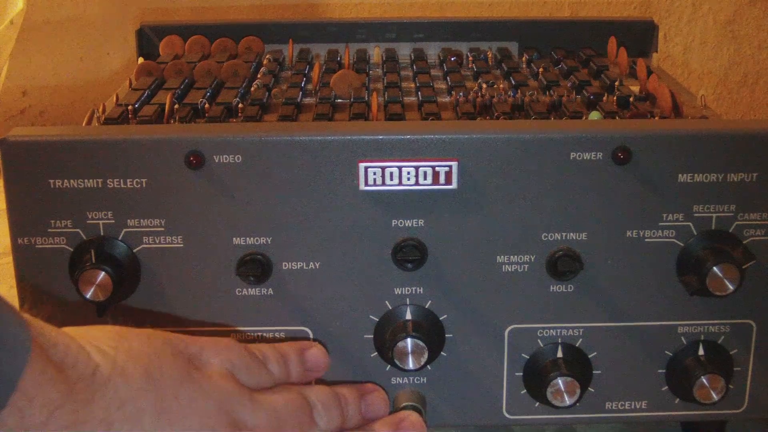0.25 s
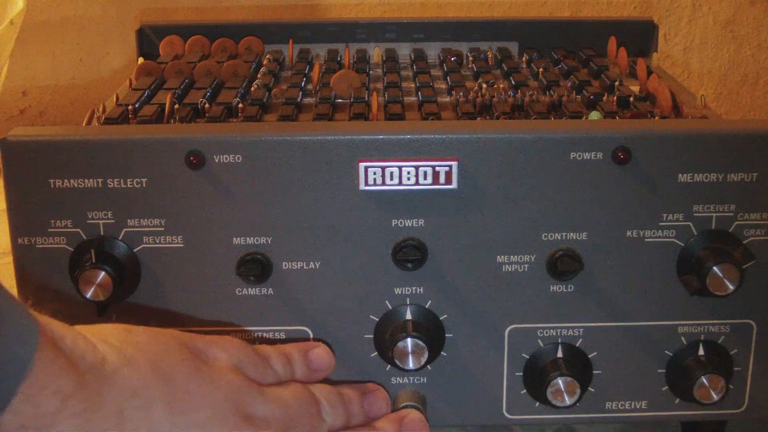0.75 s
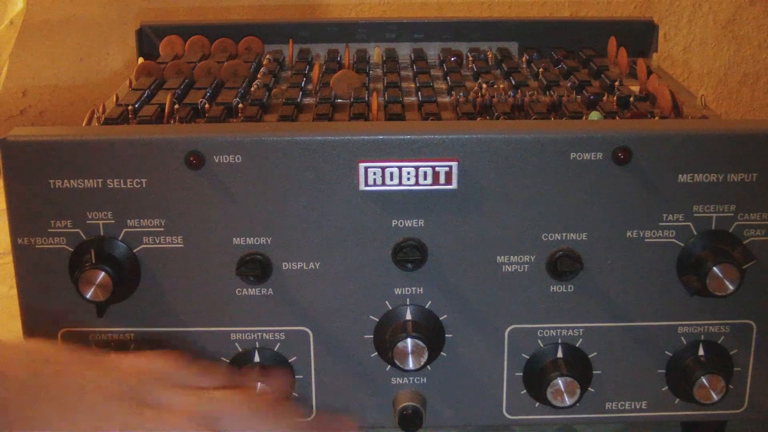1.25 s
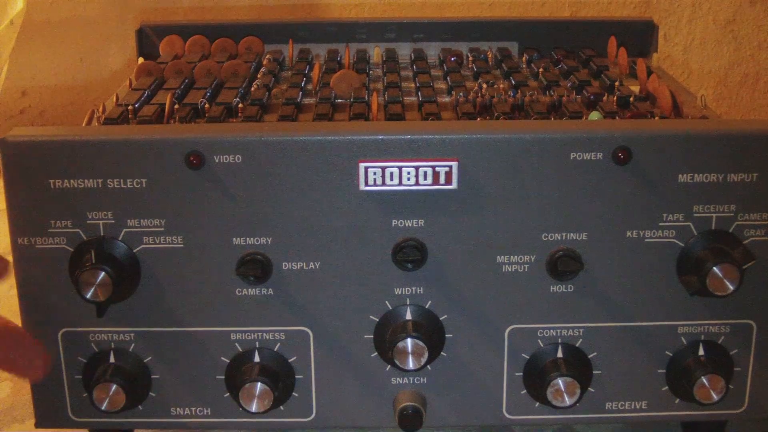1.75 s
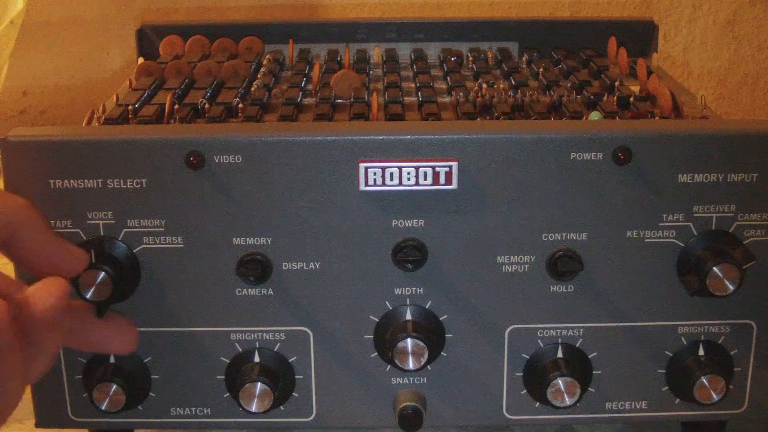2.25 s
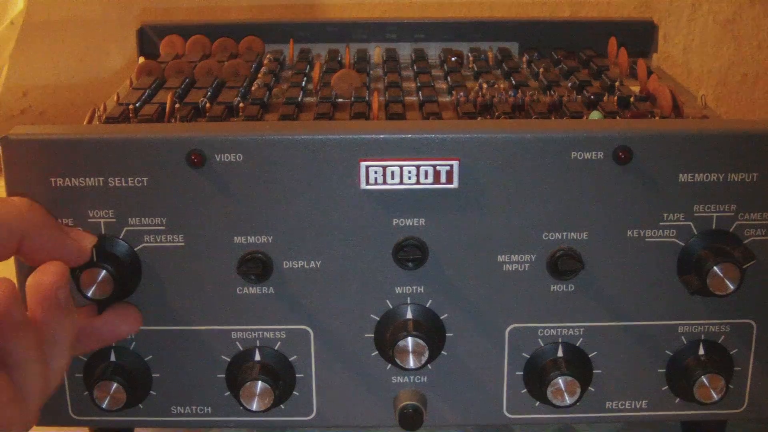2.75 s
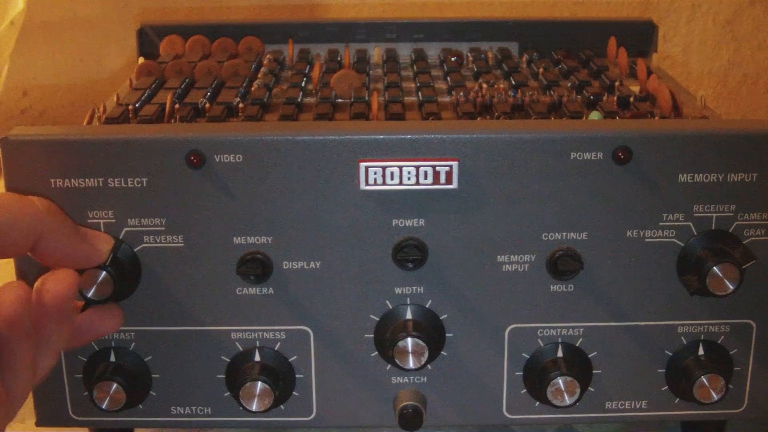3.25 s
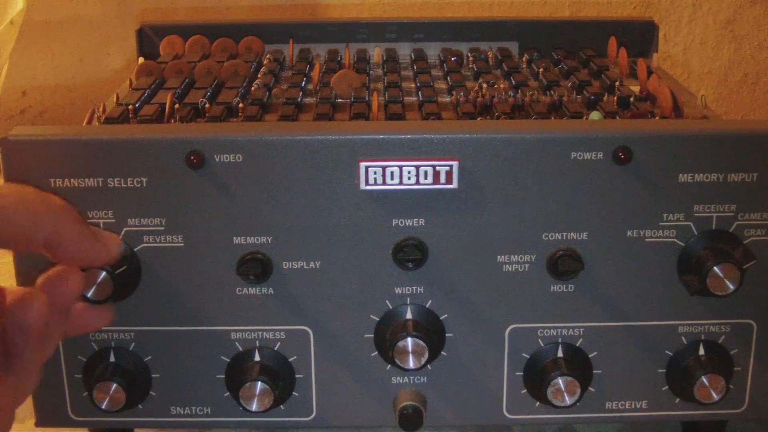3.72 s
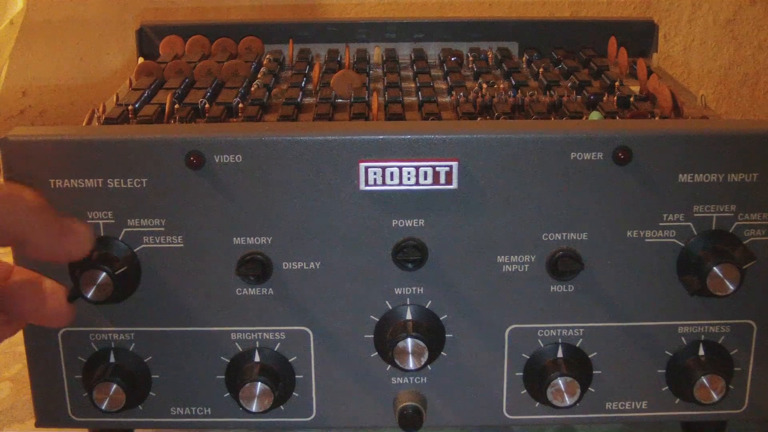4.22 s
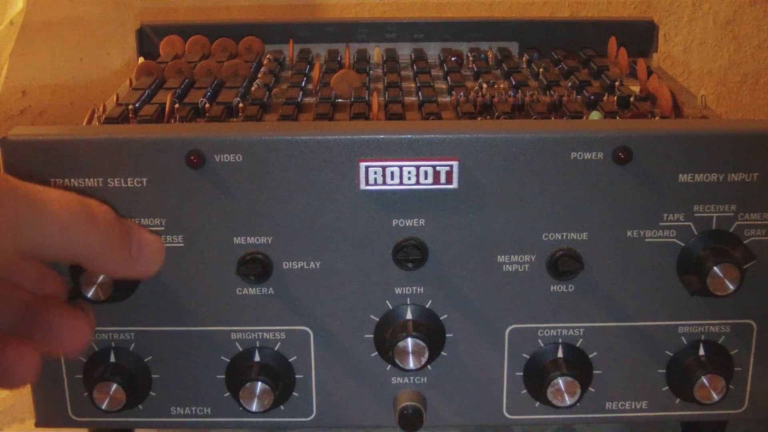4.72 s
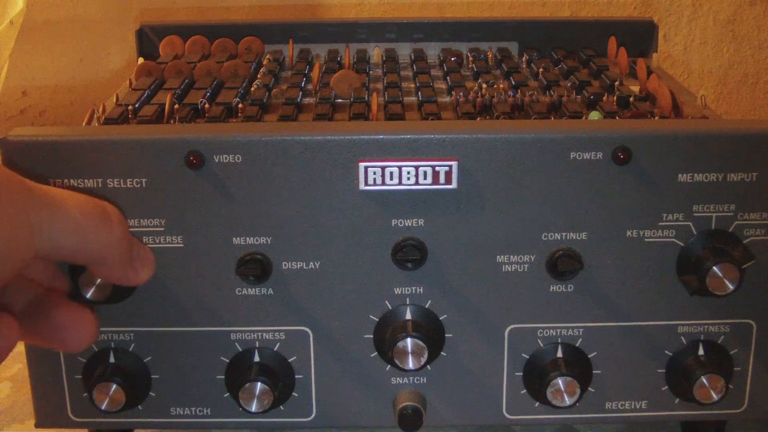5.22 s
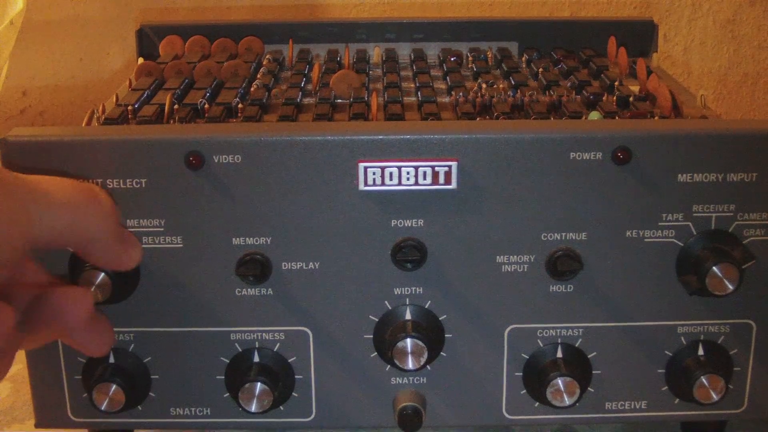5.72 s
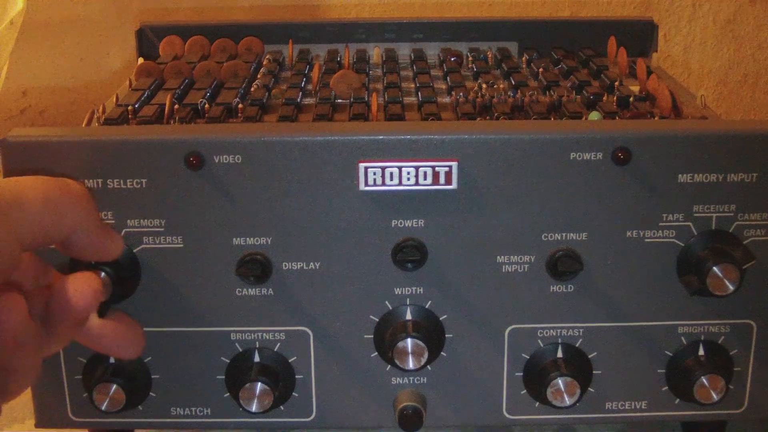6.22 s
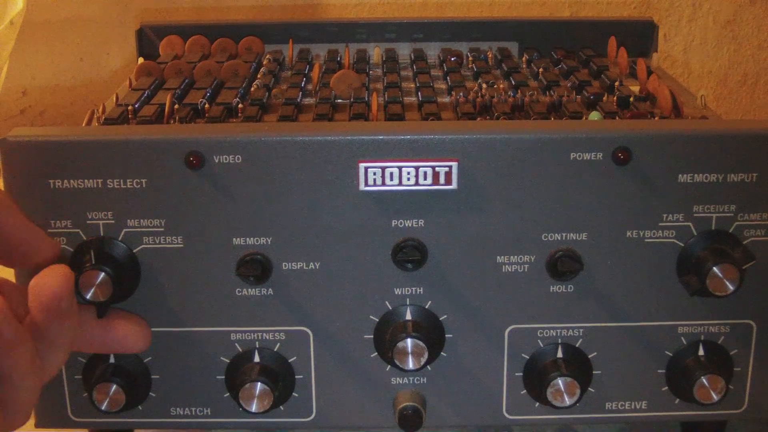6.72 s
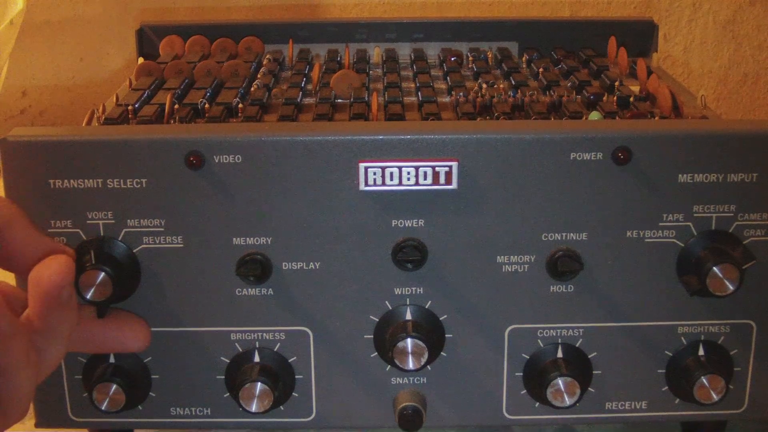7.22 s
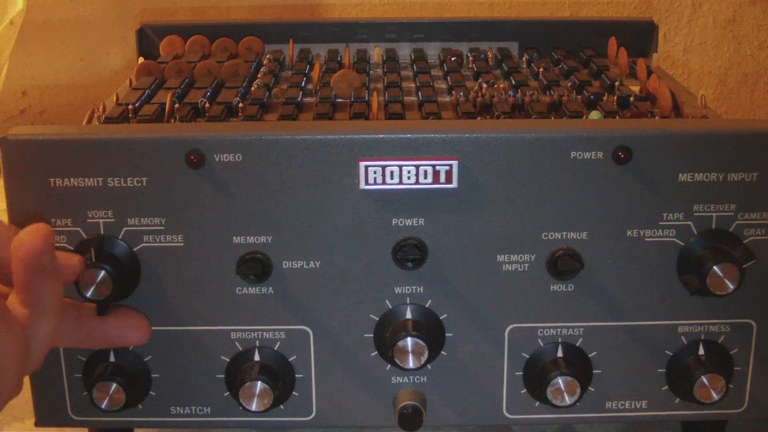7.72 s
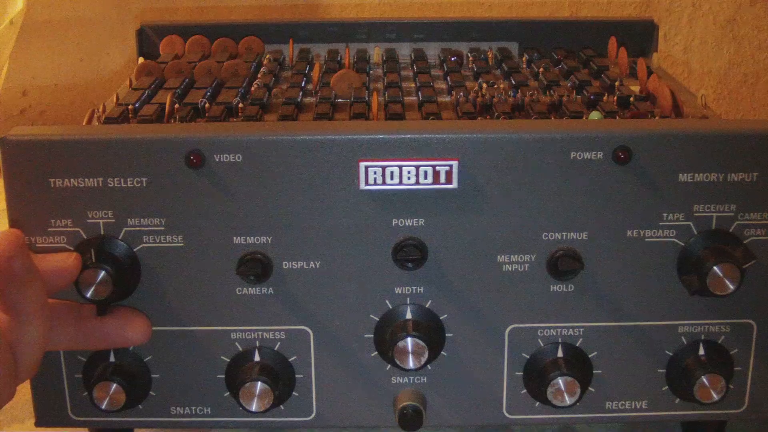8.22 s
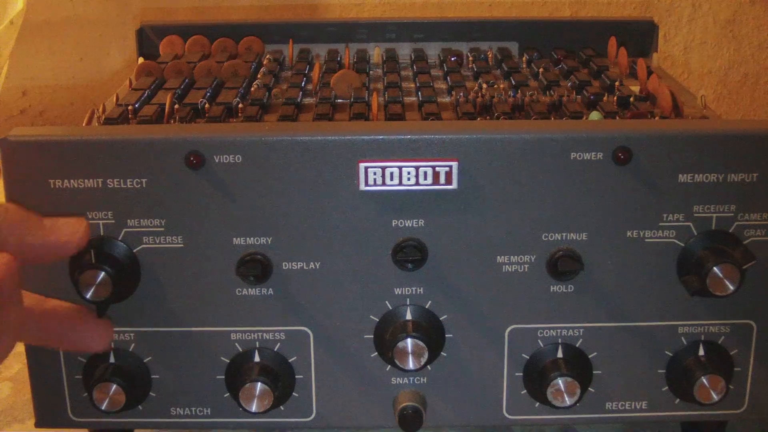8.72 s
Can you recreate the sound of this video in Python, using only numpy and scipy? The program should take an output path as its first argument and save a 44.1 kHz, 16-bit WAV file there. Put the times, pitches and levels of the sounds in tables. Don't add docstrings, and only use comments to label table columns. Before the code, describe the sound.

Faint ticks and a sharp button click, then four hard rotary switch snaps in two pairs on a metal panel in a quiet, hissy room.

```python
import sys
import numpy as np
from scipy import signal
from scipy.fft import rfft, irfft
from scipy.io import wavfile

SR = 44100
rng = np.random.default_rng(int(sys.argv[2]) if len(sys.argv) > 2 else 0)


def to_linear_factor(level_db):
    exponent = np.asarray(level_db, float) / 20
    return 10 ** exponent


def to_wav(sig):
    pcm = np.clip(np.atleast_2d(sig), -1, 1) * 32767
    pcm = np.round(pcm).astype(np.int16)
    wavfile.write(sys.argv[1], SR, pcm.T)


N = 395136
SPAN = 2 ** 13
OCTAVES_HZ = 12 * 2 ** np.arange(12.)


def at_hz(points, hz):
    points_hz, values = np.array(points).T
    return np.interp(np.log(hz), np.log(points_hz), values)


def rms_one(x):
    return x / np.sqrt(np.mean(x ** 2) + 1e-20)


def fade(t60_s):
    return np.exp(-np.log(1000) * np.arange(SPAN) / SR / max(t60_s, 1e-4))


def ring(hz, t60_s, rise_s, phase=0):
    tone = np.sin(2 * np.pi * hz * np.arange(SPAN) / SR + phase)
    return tone * fade(t60_s) * (1 - fade(rise_s))


def stereo_noise(size, colour, likeness):
    hz = np.maximum(np.arange(size // 2 + 1) * SR / size, 1)
    mid, side = rfft(rng.standard_normal((2, size))) * rms_one(to_linear_factor(at_hz(colour, hz)))
    alike = np.clip(at_hz(likeness, hz), -1, 1)
    mid, side = np.sqrt(1 + alike) * mid, np.sqrt(1 - alike) * side
    return hz, (mid + side * [[1], [-1]]) / np.sqrt(2)


def bands(hz, spectra, first):
    for centre_hz in OCTAVES_HZ[first:]:
        weight = np.clip(1 - np.abs(np.log2(hz / centre_hz)), 0, 1)
        yield centre_hz, irfft(spectra * weight)


def add(out, sound, start_s):
    at = round(start_s * SR)
    out[:, at:at + SPAN] += sound[..., :N - at]


def drift(rate_hz):
    return np.interp(np.arange(N) * rate_hz / SR, np.arange(400), rng.standard_normal(400))


# freq_hz, likeness [0-1]
NEAR_LIKENESS = [(300, 0.6), (1700, 0.9), (3100, 0.6), (6800, 0.1), (15000, 0)]
# freq_hz, likeness [0-1]
CRACK_LIKENESS = [(300, 0.8), (2000, .8), (3300, 0.98), (4700, .7), (6800, 0.15), (9000, 0.1), (13000, 0.3)]
# freq_hz, t60_s
TAIL_T60 = [(300, 0.076), (1000, 0.14), (2500, 0.17), (6000, 0.18), (12000, 0.14), (20000, .17)]


def strikes(contacts, crack_colour, tail_colour, modes, main_t60_s, crack_db, crack_t60_s,
            modes_db, tail_db, tail_stretch, settle_db):
    out = np.zeros((2, N))
    gather = 1 - fade(0.0048)
    for k, (start_s, peak_db, main_hz, treble_db, wet_db, pan_db) in enumerate(contacts):
        phase = rng.uniform(-0.6, 0.26, (2, 1)) + [[0.1 * pan_db], [0]]
        sound = ring(main_hz, main_t60_s, 0.0021, phase)

        for hz, db, t60_s in modes:
            gain = to_linear_factor(modes_db + db + rng.normal(0, 4.7, (2, 1)))
            sound += gain * ring(hz, min(t60_s, 0.09), 0.0018, rng.uniform(-1.3, 2.4, (2, 1)))

        hz, crack = stereo_noise(SPAN, crack_colour, CRACK_LIKENESS)
        tilt_db = treble_db * np.log2(np.maximum(hz, 2000) / 5000)
        crack_gain = to_linear_factor(crack_db - settle_db * (k > 0))
        sound += crack_gain * irfft(crack * to_linear_factor(tilt_db)) * fade(crack_t60_s) * (1 - fade(0.001))
        sound /= np.abs(sound).max()

        lumps_db = 1.5 * np.interp(np.arange(SPAN) / 90, np.arange(200), rng.standard_normal(200))
        tail_gain = to_linear_factor(tail_db + wet_db + lumps_db) * gather
        for centre_hz, pair in bands(*stereo_noise(SPAN, tail_colour, NEAR_LIKENESS), first=4):
            sound += tail_gain * pair * fade(tail_stretch * at_hz(TAIL_T60, centre_hz))
        add(out, to_linear_factor(peak_db) * sound * to_linear_factor([[pan_db / 2], [-pan_db / 2]]), start_s)
    return out


def skin(strokes, colour, grain_db):
    t = np.arange(N) / SR
    gain = 0
    for loudest_s, level_db, swell_s, fade_s in strokes:
        fall_db = 30 * np.maximum((loudest_s - t) / swell_s, (t - loudest_s) / fade_s)
        gain = gain + to_linear_factor(level_db - fall_db)
    grain = to_linear_factor(grain_db * np.repeat(rng.standard_normal(N // 64 + 1), 64)[:N])
    noise = irfft(stereo_noise(N, colour, NEAR_LIKENESS)[1])
    return gain * rms_one(grain * noise)


# freq_hz, density_db [dB per Hz]
HISS = [(8, -19), (14, -7), (54, -8.5), (200, -16), (420, -18), (620, -22), (1300, -27), (3500, -28),
        (6300, -26.5), (7700, -26.5), (8400, -33), (12000, -35), (15200, -33.5), (15500, -59)]
# freq_hz, likeness [0-1]
AIR_LIKENESS = [(60, 0.33), (180, 0.42), (550, 0.52), (1650, 0.48), (4970, 0.05), (15000, 0.11)]
# freq_hz, left_minus_right_db
AIR_LEAN = [(60, -0.5), (240, -0.5), (950, -0.5), (3770, 0.5), (15000, 1)]


def air():
    hiss, together = 0, drift(2)
    for hz, pair in bands(*stereo_noise(N, HISS, AIR_LIKENESS), first=0):
        lean_db = at_hz(AIR_LEAN, hz) * np.array([[0.5], [-0.5]])
        patch_db = 0.9 * (together + drift(9)) * np.clip(np.log2(3000 / hz) / 3, 0.25, 1)
        hiss = hiss + to_linear_factor(lean_db + patch_db) * pair
    return to_linear_factor(-61.5) * rms_one(hiss)


# start_s, peak_db, main_hz, treble_db [dB per octave], left_minus_right_db
TICKS = [(0.019, -42, 6750, 9, 4), (0.1084, -22, 4080, -7.5, -2), (0.4346, -38, 4150, -13, 1),
         (0.445, -35, 3960, -6, -2), (0.458, -44, 4460, -1, 0), (0.614, -31.5, 4130, -17, 2.5),
         (0.6476, -44, 3800, 15, 3), (0.802, -41, 4030, -30, -1), (1.0021, -47, 6030, 8, 2.5),
         (1.036, -41, 3700, -12, -4), (1.0433, -38, 4500, -5, 4), (1.205, -37.5, 4130, 14, 2),
         (1.2311, -10, 4150, 1, -0.5), (1.2346, -29, 4370, 11, 0.5), (1.426, -48, 6550, 4, 1.0)]
# freq_hz, density_db [dB per Hz]
TICK_CRACK = [(710, -87), (1200, -18), (2450, -40), (3590, -7), (4310, 5.5), (5650, -6), (9820, -15),
              (15000, -36), (16000, -38)]
# freq_hz, density_db [dB per Hz]
TICK_TAIL = [(590, -51.5), (1000, -15), (1630, -27), (1840, -15), (3120, -15.5), (4300, -1.5),
             (5180, -10.5), (8060, -8.5), (14000, -50)]


def button_ticks():
    contacts = [(s, db, hz, treble_db, -1.9, pan_db) for s, db, hz, treble_db, pan_db in TICKS]
    return strikes(contacts, TICK_CRACK, TICK_TAIL, [], main_t60_s=0.005, crack_db=-1.5,
                   crack_t60_s=0.0044, modes_db=0, tail_db=-24.5, tail_stretch=0.85, settle_db=2)


# loudest_s, level_db, swell_s, fade_s
SCUFFS = [
    (0.448, -52.5, .025, 0.033),
    (1.046, -48, 0.049, 0.055),
    (1.222, -51, 0.095, 0.0061),
]
# freq_hz, density_db [dB per Hz]
SCUFF = [(710, -49.5), (1200, -11), (1480, -16), (3030, -12.5), (4390, -4.5), (7010, -12), (9830, -32),
         (13000, -39)]


def button_scuffs():
    return skin(SCUFFS, SCUFF, grain_db=2.5)


# start_s, drum_db, push_db, slip_db
THUDS = [
    (1.232, -60, -49, -42),
    (3.068, -38.5, -37, -36.5),
    (3.605, -43, -30.5, -32),
    (5.588, -48.5, -50, -37),
    (6.2, -49, -44, -31.5),
]
# freq_hz, level_db, t60_s
CHASSIS = [(190, -6, 0.13), (258.2, -3.5, 0.22), (284, -1, 0.22), (315, -2, .14), (352.2, 1, 0.029),
           (409.4, -6.5, 0.067), (490, -1.5, 0.1), (620, -8.5, 0.087), (934, -7.5, .1)]
# freq_hz, density_db [dB per Hz]
KNOB_CRACK = [(1200, -29), (2500, -3.5), (4500, 0), (7000, -3.5), (10000, -8.5), (13000, -15), (16000, -31)]


def thuds():
    out = np.zeros((2, N))
    for start_s, drum_db, push_db, slip_db in THUDS:
        drum = 0
        for hz, db, t60_s in CHASSIS:
            gain = to_linear_factor(db + rng.normal(0, 2, (2, 1)))
            drum = drum + gain * ring(hz, 1.1 * t60_s, 0.029, rng.uniform(0, 0.9, (2, 1)))
        push = ring(45, 0.093, 0.0047) + 0.4 * ring(110, 0.047, 0.003)
        jolt = to_linear_factor(drum_db) * drum + to_linear_factor(push_db) * push
        add(out, jolt * to_linear_factor([[2.2], [-2.2]]), start_s)

        climb = (fade(0.009) + 0.1 * fade(0.067))[::-1]
        slip = irfft(stereo_noise(SPAN, KNOB_CRACK, NEAR_LIKENESS)[1]) * climb
        add(out, to_linear_factor(slip_db) * slip, start_s - SPAN / SR)
    return out


# first_s, last_s, first_db, last_db
STEPS = [
    (2.178, 2.179, -48, -51),
    (2.771, 2.906, -46.5, -40),
    (3.171, 3.338, -49.5, -49.5),
    (3.372, 3.439, -44, -42.5),
]


def motor_steps():
    rows = []
    for first_s, last_s, first_db, last_db in STEPS:
        count = round((last_s - first_s) * 30) + 1
        db = np.linspace(first_db, last_db, count) + 0.7 * rng.standard_normal(count)
        treble_db = -3.5 + 0.9 * (db + 44.5)
        rows += zip(np.linspace(first_s, last_s, count), db, treble_db)
    return rows


# freq_hz, level_db, t60_s
LENS = [(923, -8.5, 0.07), (1022, -3, 0.042), (1605, -9, .03), (2300, -17, 0.1), (2550, 4.5, 0.022),
        (2770, -5.5, 0.03), (3520, -1, 0.017), (5050, -3, 0.016)]
# freq_hz, density_db [dB per Hz]
LENS_TOP = [(1650, -11), (2800, -19), (3100, -3), (4580, -7), (5050, -5), (7330, -2.5), (11000, -27),
            (14300, -59), (22000, -120)]


def lens():
    out = np.zeros((2, N))
    for start_s, peak_db, treble_db in motor_steps():
        low = 0
        for hz, db, t60_s in LENS:
            gain = to_linear_factor(db + rng.normal(0, 1.4) + treble_db * (hz > 3000))
            low = low + gain * ring(hz, t60_s, 8.6 / hz)
        top = irfft(stereo_noise(SPAN, LENS_TOP, NEAR_LIKENESS)[1]) * fade(0.025) * (1 - fade(0.00079))
        step = to_linear_factor(peak_db - 4.5) * (low * to_linear_factor([[-6], [3]]) + to_linear_factor(treble_db) * top)
        add(out, step, start_s)
        add(out, 0.24 * step, start_s - rng.uniform(0.00185, 0.0026))
    return out


# start_s, peak_db, main_hz, treble_db [dB per octave]
PLAY = [
    (2.9542, -42, 4550, -6),
    (2.9796, -46, 4300, -5),
    (3.0307, -46, 4550, -2),
    (3.5698, -46, 4300, 6),
    (4.209, -53.5, 6540, 1),
    (6.4918, -37.5, 4640, 8.5),
    (6.6119, -42, 4630, 1),
    (8.632, -37.5, 6650, -1),
]
# freq_hz, level_db, t60_s
KNOB = [(2650, -4.5, 0.016), (4370, -2.5, 0.024)]


def knob_play():
    contacts = [(*row, 2.5, -0.4) for row in PLAY]
    return strikes(contacts, KNOB_CRACK, TAILS[3], KNOB, main_t60_s=0.0046, crack_db=-4.0,
                   crack_t60_s=0.0028, modes_db=-12, tail_db=-24.5, tail_stretch=0.4, settle_db=-1)


# start_s, peak_db, main_hz, treble_db [dB per octave], tail_db
SNAPS = [
    [(3.0691, -2.5, 6810, 1.5, 0.5), (3.0722, -4, 7000, 2, -3), (3.0748, -14.5, 6500, 0, 2.5)],
    [(3.6049, 0, 7360, 4, -0.5), (3.6060, -8, 4270, -3.5, -7), (3.6080, -4.5, 7100, 0, -10),
     (3.6114, -14, 6800, -5, 0)],
    [(5.5878, -13.5, 6670, 1, -3), (5.5887, -15, 4600, -2, -4.5), (5.5915, -22.5, 6440, -4.5, -4),
     (5.5945, -30, 6420, 7, 0)],
    [(6.1982, -22, 4700, 1, 3), (6.1997, -6.5, 6100, -2.5, -4.5), (6.2008, -8, 4600, 2, 5),
     (6.2030, -9.5, 6200, -2, -7.5), (6.2048, -16.5, 6600, -4, -1), (6.2075, -23.5, 7000, 7, -6.5)],
]
# freq_hz, density_db [dB per Hz]
CRACKS = [
    [(240, -47.5), (400, -11), (1600, -30.5), (3070, -15.5), (4400, -5), (7280, -4), (8630, -11),
     (14800, -19), (16000, -35)],
    [(240, -51.5), (800, -28), (2590, -18.5), (4240, -3.5), (5350, -4.5), (7170, -7.5), (8110, -8),
     (14800, -20), (16000, -33.5)],
    [(240, -51), (400, -25), (3500, -13), (4650, -6), (5430, -7), (6340, -1), (11800, -11), (15300, -28),
     (16000, -32)],
    [(240, -67.5), (400, -25.5), (1560, -37.5), (2590, -22), (3120, -19), (6240, -2), (8500, -14),
     (15300, -20.5), (16000, -37.5)],
]
# freq_hz, density_db [dB per Hz]
TAILS = [
    [(240, -48), (400, -12.5), (489, -24.5), (1840, -25), (2550, -12.5), (2800, -30), (3070, -19.5),
     (6640, -1.5), (14600, -23.5), (16000, -39)],
    [(240, -48), (400, -19), (496, -8), (760, -22.5), (1900, -14), (2250, -13), (5690, -5), (6850, -1.5),
     (14600, -17), (16000, -36)],
    [(240, -30), (400, 1), (504, -10), (1230, -16), (2630, -12), (3750, -13), (4510, -3), (7280, -3),
     (15000, -19), (16000, -34)],
    [(240, -42.5), (400, -10.5), (1090, -30.5), (2430, -20.5), (2880, -23.5), (4110, -11), (7170, 2),
     (8500, -11.5), (14800, -21.5), (16000, -46)],
]
# freq_hz, level_db, t60_s
SWITCH = [(2940, -13, .04), (4490, -4, 0.022), (4600, -8, 0.1), (5000, -5.5, 0.044), (5843, -2, 0.048),
          (6440, 0, .05), (6350, -3, 0.047), (6580, 6, 0.032), (7100, -1.5, .06), (7148, -3.5, 0.14),
          (7275, -1.5, .05), (10670, 3.5, 0.013), (9520, -9, 0.042), (11290, -10.5, 0.038)]


def detent_snaps():
    out = 0
    for snap, crack, tail in zip(SNAPS, CRACKS, TAILS):
        contacts = [(*row, 0) for row in snap]
        out = out + strikes(contacts, crack, tail, SWITCH, main_t60_s=0.0051, crack_db=4.0,
                            crack_t60_s=0.0075, modes_db=-24.5, tail_db=-25.0, tail_stretch=1.1, settle_db=7.0)
    return out


# loudest_s, level_db, swell_s, fade_s
RUBS = [
    (3.88, -58, 0.22, .052),
    (4.394, -67, 0.033, .19),
    (4.93, -62.5, 0.037, .16),
    (8.115, -61, 0.18, 0.12),
    (8.12, -69.5, .9, .9),
]
# freq_hz, density_db [dB per Hz]
RUB = [(1500, -28.5), (3000, -11), (4500, -11), (6200, -0.5), (7500, -1.5), (9000, -11), (12000, -13.5),
       (15000, -28.5)]


def knob_rubs():
    return skin(RUBS, RUB, grain_db=-1.0)


# freq_hz, left_minus_right_db
PORTS = [(3500, 0.7), (4700, -2.5), (5600, -1), (6800, 5), (9500, 3), (13000, -1.5)]


def ports(x):
    hz = np.maximum(np.arange(N // 2 + 1) * SR / N, 1)
    return irfft(rfft(x) * to_linear_factor(at_hz(PORTS, hz) * np.array([[0.5], [-0.5]])))


def scene():
    no_bass = signal.butter(2, 1500, "high", fs=SR, output="sos")
    light = signal.sosfilt(no_bass, button_ticks() + knob_play())
    contacts = ports(detent_snaps() + light)
    fingers = button_scuffs() + knob_rubs()
    return air() + fingers + thuds() + lens() + contacts


def band_limit(x):
    return signal.sosfilt(signal.butter(12, 16500, fs=SR, output="sos"), x)


OFFSET = [
    [-.00094],
    [-.00072],
]


def record(dry):
    rounded = dry / (1 + np.abs(dry / 0.9) ** 6) ** (1 / 6)
    top_cut = signal.cheby2(14, 70, 16500, fs=SR, output="sos")
    mix = signal.sosfilt(top_cut, rounded) + OFFSET
    return band_limit(mix)


dry = scene()
out = record(dry)
to_wav(out)
```